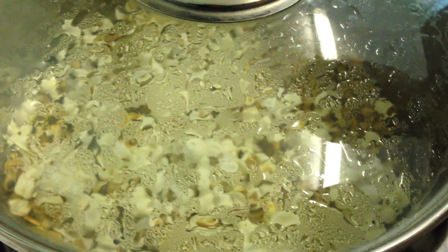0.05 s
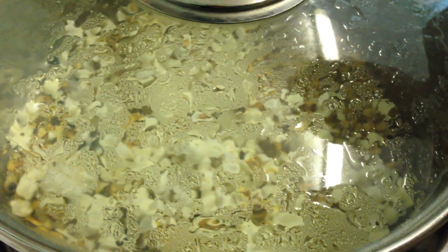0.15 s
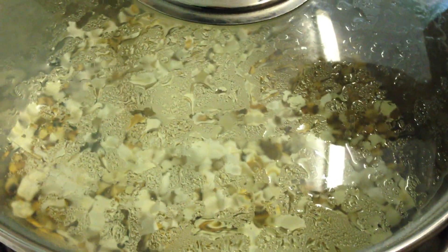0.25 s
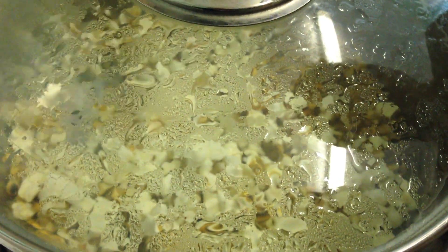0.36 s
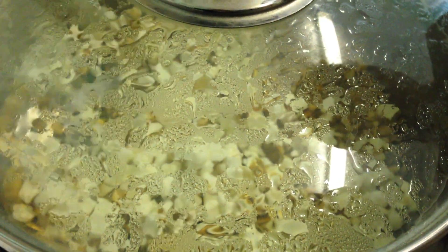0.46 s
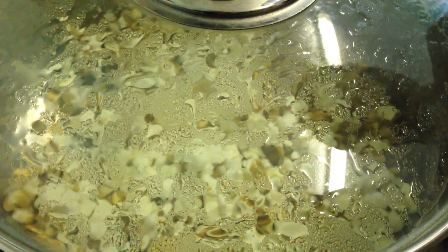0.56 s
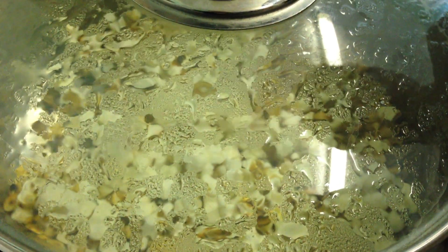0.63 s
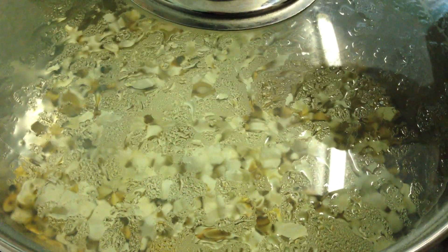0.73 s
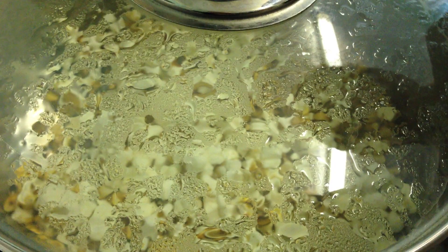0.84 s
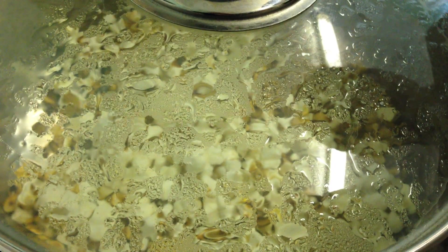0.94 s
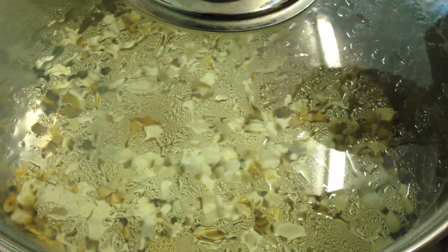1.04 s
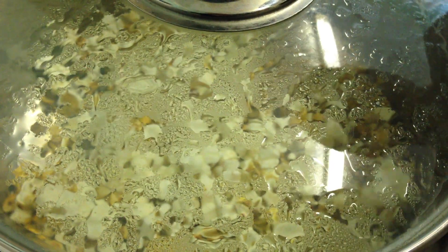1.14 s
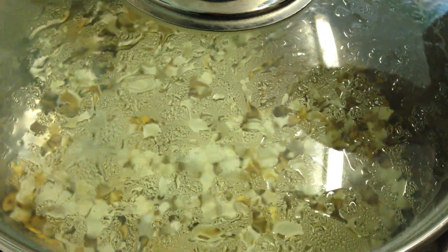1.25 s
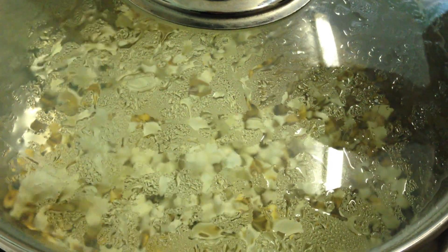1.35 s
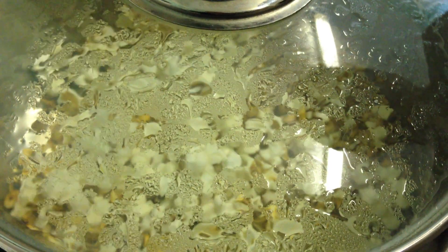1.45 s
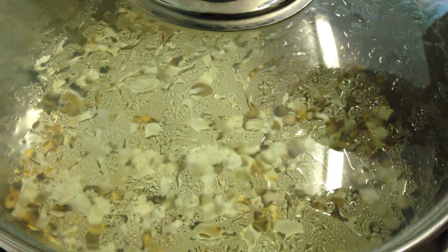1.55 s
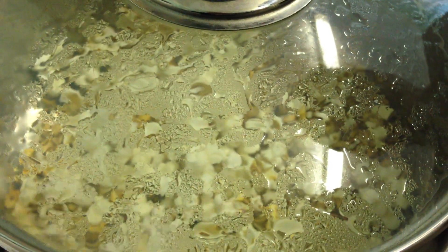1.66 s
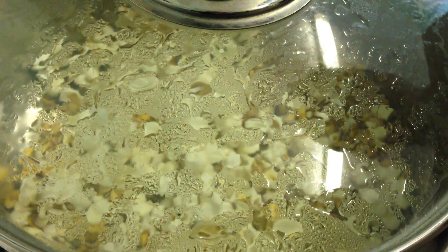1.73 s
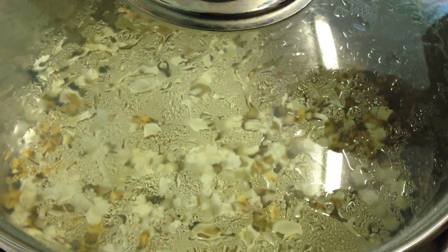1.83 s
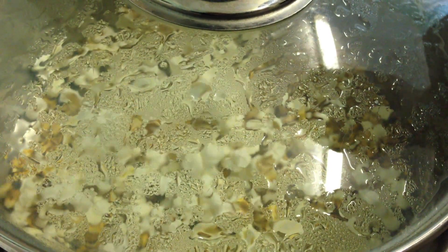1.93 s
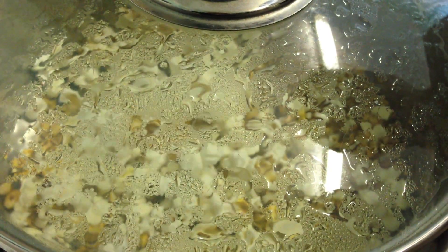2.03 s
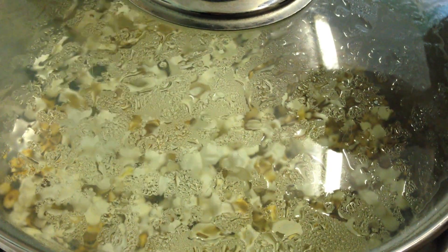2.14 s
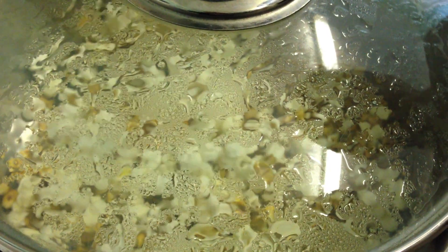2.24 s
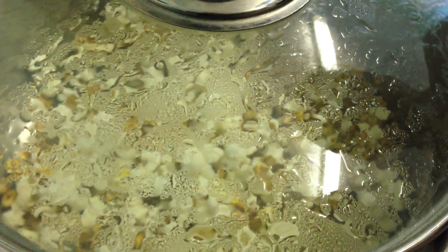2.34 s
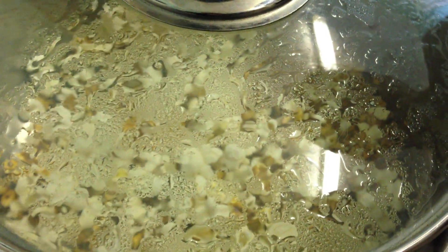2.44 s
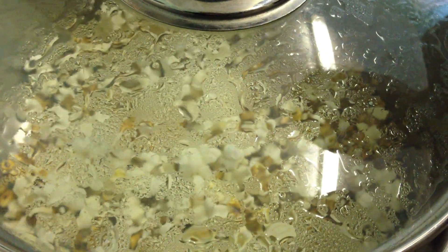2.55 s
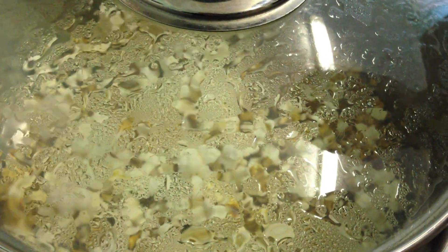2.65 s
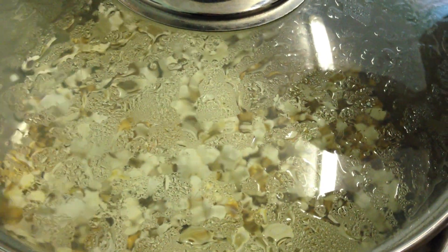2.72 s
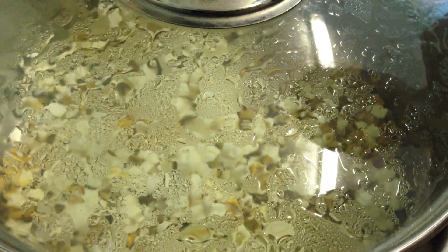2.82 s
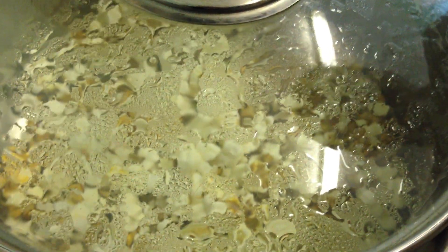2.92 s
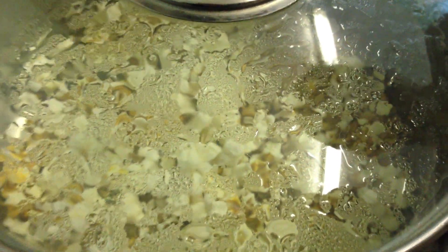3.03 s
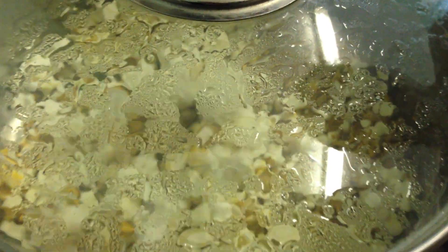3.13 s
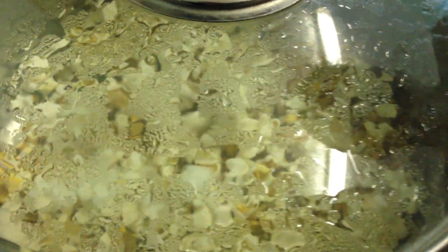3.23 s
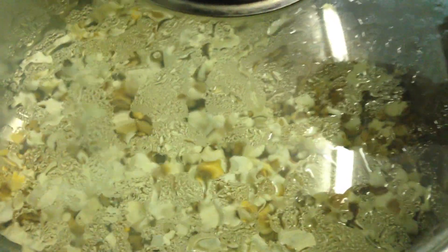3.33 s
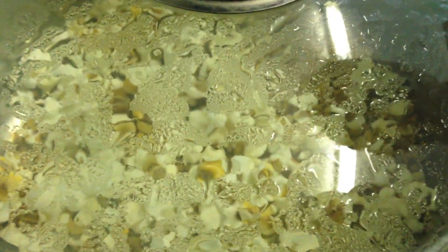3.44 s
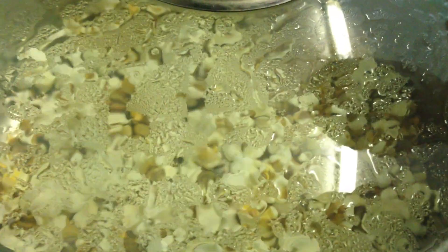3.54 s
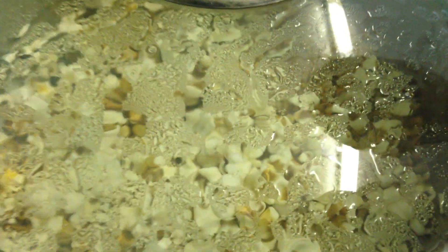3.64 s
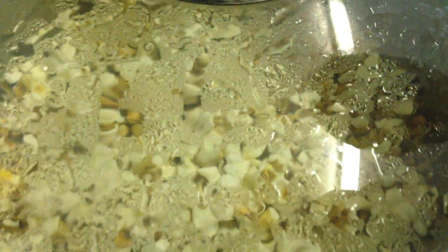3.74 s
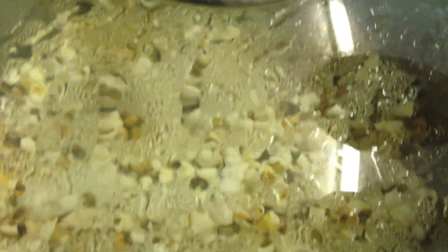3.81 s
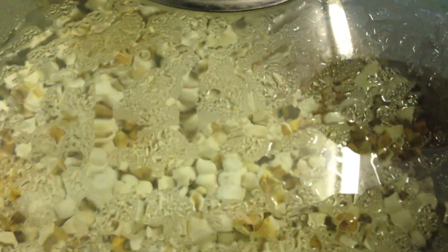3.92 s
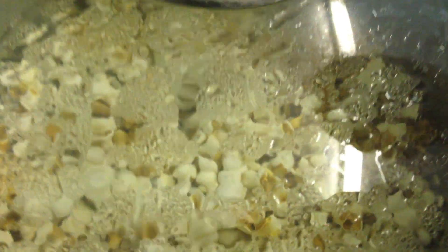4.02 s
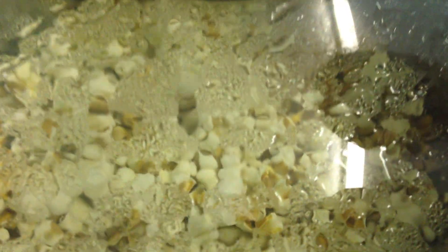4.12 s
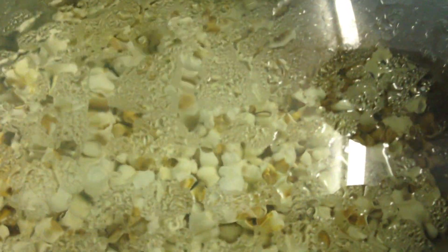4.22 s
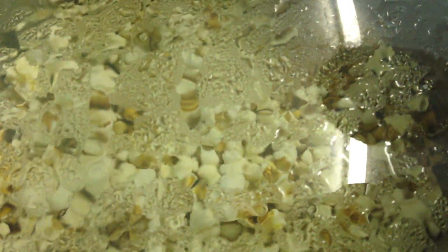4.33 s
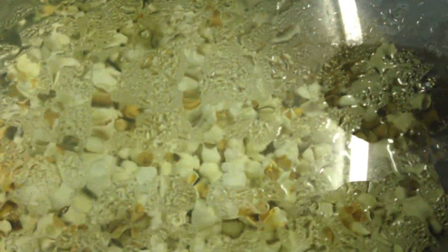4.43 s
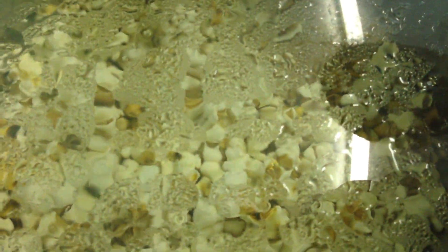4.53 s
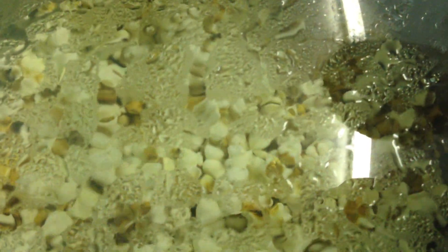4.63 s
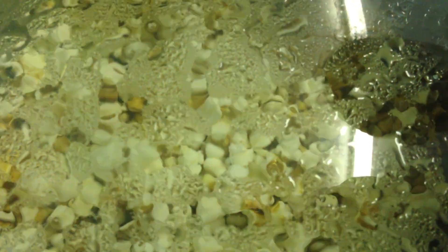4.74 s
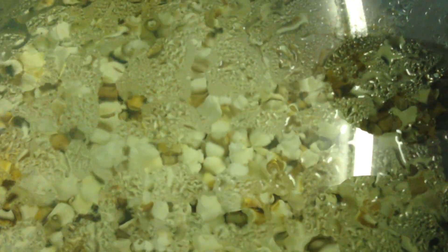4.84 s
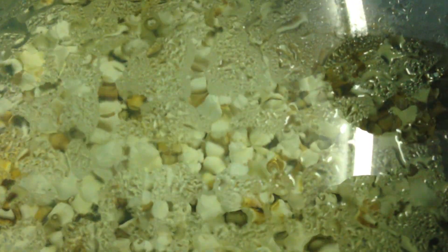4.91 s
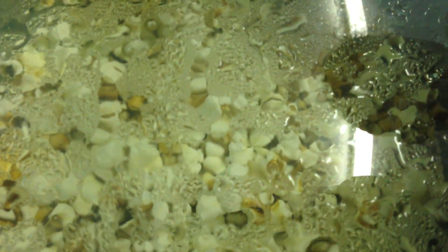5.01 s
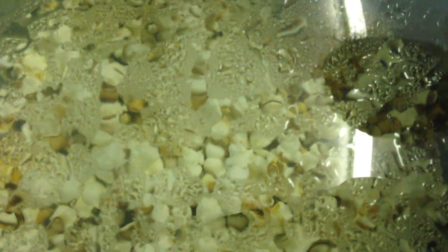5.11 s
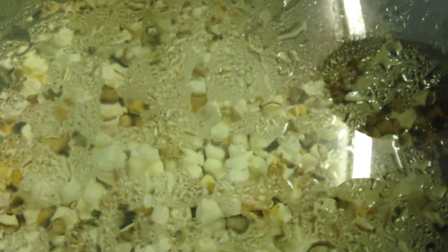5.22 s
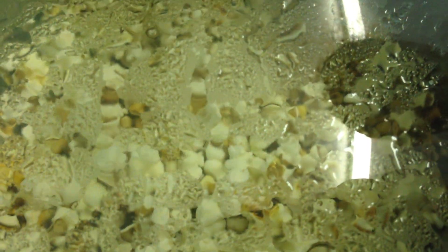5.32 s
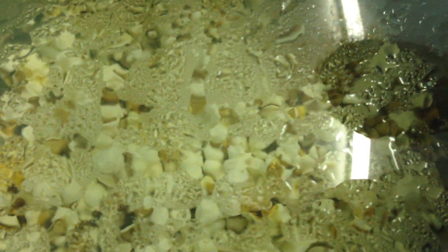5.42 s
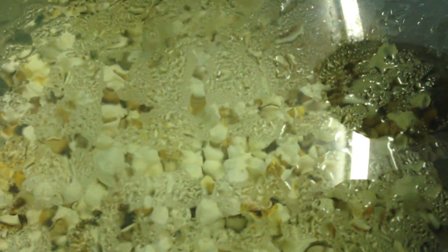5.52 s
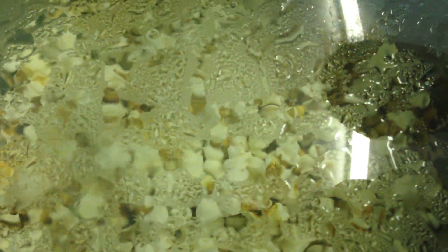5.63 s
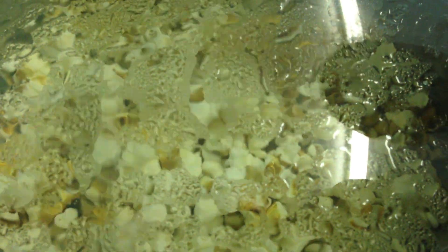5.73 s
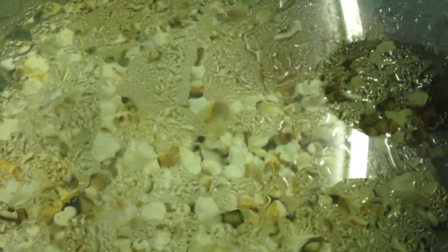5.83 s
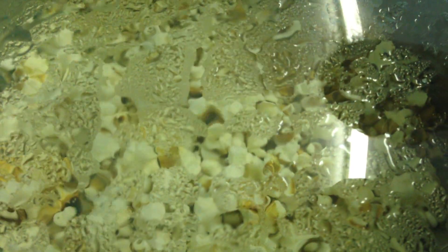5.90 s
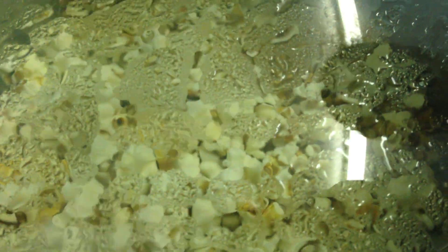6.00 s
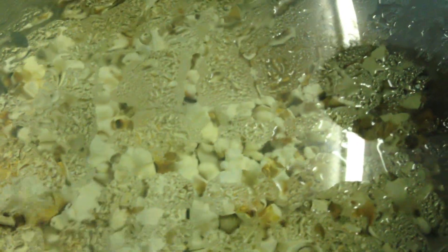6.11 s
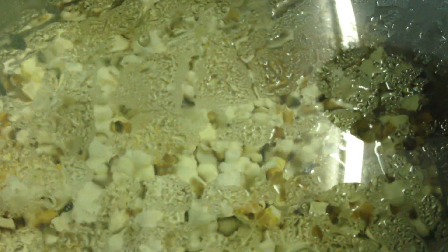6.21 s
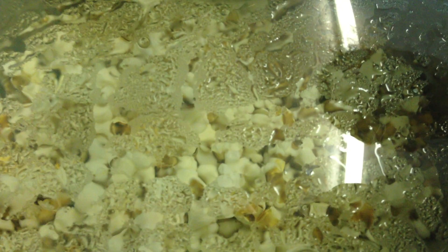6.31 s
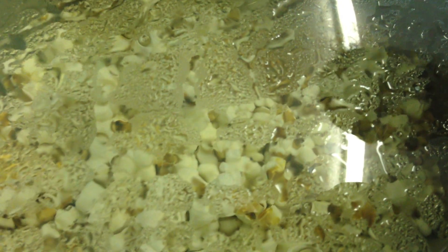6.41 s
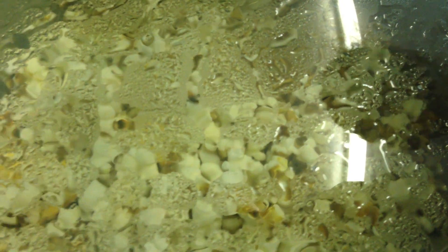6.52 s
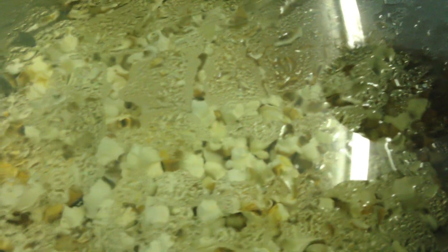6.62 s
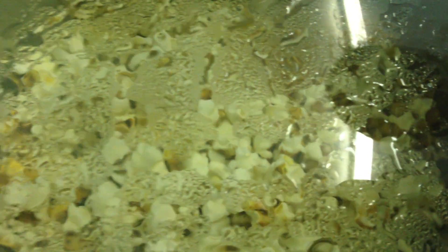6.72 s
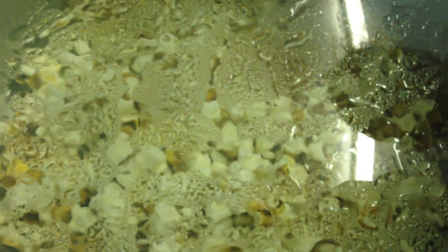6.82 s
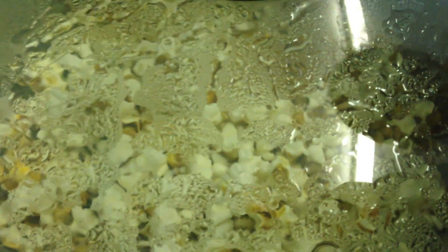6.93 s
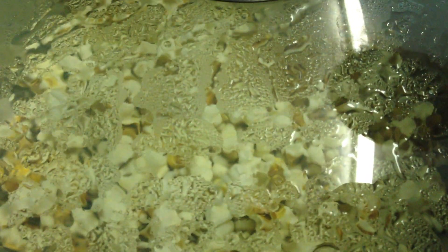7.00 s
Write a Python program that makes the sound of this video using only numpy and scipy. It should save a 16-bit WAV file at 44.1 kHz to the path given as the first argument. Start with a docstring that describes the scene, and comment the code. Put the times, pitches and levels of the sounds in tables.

```python
"""Popcorn bursts in a lidded metal pot on a stove, heard from just above the lid in a small kitchen. Each
kernel is a sharp crack or short rush of noise that rings the pot's modes and thumps the lid's. The pot rattles
on its grate and corn rustles after each nudge; the lid drops back on its rim with a clack. Beneath lie a
swelling hiss of steam and, near 1.28 s, of sliding corn, made of fizzing noise and resonances, with ticking
oil, a low rumble of corn and the burner's even rush."""
import sys
import numpy as np
from scipy import signal
from scipy.fft import rfft, irfft
from scipy.io import wavfile
from scipy.ndimage import uniform_filter1d

SR = 44100
rng = np.random.default_rng(int(sys.argv[2]) if len(sys.argv) > 2 else 0)


def wav_out(sig):
    """Save sig, one row per channel (or a flat mono array), as 16-bit PCM at SR to the path in sys.argv[1]."""
    wavfile.write(sys.argv[1], SR, np.round(np.clip(np.atleast_2d(sig).T, -1, 1) * 32767).astype(np.int16))


N = 311342
LENGTH = 8192  # samples in one burst or ring
AGE = np.arange(LENGTH) / SR  # s since the blow

# modes of the pot and the air in it: freq_hz, level_db, t60_s
POT_MODES = [(1314.5, 2, 0.058), (2128.5, 2, 0.07), (2627, -7.5, 0.086), (2867, -12, 0.034),
             (3076, -6, 0.046), (3347, -8, 0.049), (3592, -6, 0.05), (3711, -7.5, 0.071),
             (4166, -1.5, 0.018), (4400, -5.5, 0.048), (4920, -1.5, 0.032), (5740, -15, 0.046),
             (5726, -10, 0.079), (6380, -5.5, 0.043), (7490, -5, 0.021)]
# modes of the lid heaving on the trapped air: freq_hz, level_db, t60_s
LID_MODES = [(172.6, -17.5, 0.19), (217.4, -1.5, 0.14), (225.5, -25, 0.17), (280.6, -15, 0.2),
             (367, -26.5, 0.029)]
# nudges that rock the pot on the grate: start_s, level_db, clatter_t60_s
NUDGES = [(.428, -43, 0.27), (.495, -41, 0.083), (.554, -41, 0.048), (.605, -50.5, 0.37),
          (1.075, -49, 0.18), (1.13, -53, .12), (1.49, -59, 0.34), (1.93, -50, 0.28), (2.692, -53, 0.091),
          (2.828, -57.5, .1), (3.176, -50, 0.52), (4.119, -54.5, 0.24), (5.755, -51, 0.31),
          (5.82, -56, .15), (6.027, -54, .06), (6.2, -54.5, 0.13)]

BURST_T60_S = 0.024  # of a strong kernel
SNAP_SHARE = 0.12  # of burst energy in the first swing, at treble_db = 0
REF_HISS_DB = -56.5  # hiss level at which rumble, oil and small pops have their nominal levels


def undb(db):
    """Decibels to amplitude gain."""
    return 10 ** (np.asarray(db) / 20)


def unit(x):
    """Scale to an rms of one."""
    return x / np.sqrt(np.mean(x ** 2))


def fade(t_s, t60_s):
    """Exponential decay, 60 dB down after t60_s."""
    return np.exp(-np.log(1000) * t_s / np.maximum(t60_s, 1e-3))


def db_at(freq_hz, points):
    """Interpolate (freq_hz, gain_db) points on a log-frequency axis."""
    point_hz, gain_db = np.transpose(points)
    return np.interp(np.log(np.maximum(freq_hz, 1)), np.log(point_hz), gain_db)


def colour(x, *spectra, size=2048):
    """Minimum-phase filter, by folded cepstrum, whose gain is the dB sum of the spectra."""
    freq_hz = np.fft.rfftfreq(size, 1 / SR)
    gain_db = sum(db_at(freq_hz, s) for s in spectra)
    cepstrum = irfft(np.log(undb(gain_db)))
    cepstrum[1:size // 2] *= 2
    cepstrum[size // 2 + 1:] = 0
    impulse = irfft(np.exp(rfft(cepstrum)))
    return signal.fftconvolve(x, impulse)[:len(x)]


def ring(modes, scatter_db, detune, blow=((1, 0), (2, 0)), flip=True):
    """Sum of decaying sine modes; each blow lands somewhere else and weights them afresh."""
    freq_hz, level_db, t60_s = np.transpose(modes)
    size, shift, side = rng.standard_normal((len(freq_hz), 3)).T
    sign = np.where(flip, np.sign(side), 1)
    gain = sign * undb(level_db + scatter_db * size + db_at(freq_hz, blow))
    shifted_hz = freq_hz * (1 + detune * shift)
    sines = np.sin(2 * np.pi * np.outer(shifted_hz, AGE))
    return gain @ (sines * fade(AGE, t60_s[:, None]))


def resonate(x, modes):
    """A steady sound driving a set of modes, scaled to unit rms."""
    return unit(signal.fftconvolve(x, ring(modes, 0, 0, flip=False))[:N])


def walk(rate_hz):
    """Slow random drift of unit rms: smoothed random steps."""
    step = int(SR / rate_hz)
    steps = np.repeat(rng.standard_normal(N // step + 1), step)
    return unit(uniform_filter1d(steps, step)[:N])


def grains(per_s, spread_db):
    """Sparse random clicks of either sign, mostly small with a few large."""
    size = undb(spread_db * np.minimum(rng.exponential(size=N), 3))
    clicks = size * rng.choice([-1, 1], N)
    return unit(clicks * (rng.random(N) < per_s / SR))


def add(out, start_s, x):
    """Mix x in at start_s."""
    i = max(int(start_s * SR), 0)
    out[i:i + len(x)] += x[:N - i]


def burst(t60_s, snap, swing_hz=5200, swing_t60_s=.0007):
    """The hull splits with one sharp swing; steam and reflections in the pot follow as a noise rush."""
    snap = np.clip(snap, 0, 1)
    swing = np.cos(2 * np.pi * swing_hz * AGE) * fade(AGE, swing_t60_s)
    rush = rng.standard_normal(LENGTH) * fade(AGE, t60_s)
    x = np.sqrt(snap) * unit(swing) + np.sqrt(1 - snap) * unit(rush)
    return unit(x) * np.sqrt(.008 / AGE[-1])  # energy of 8 ms at unit rms


def burner():
    """The stove's soft, even rush: steady noise weighted to the lows."""
    spectrum = [(30, -9), (150, 2.0), (350, 2.5), (600, -8.5),
                (1100, -10.0), (2000, -16), (6000, -22.0), (15000, -18.5)]
    return unit(colour(rng.standard_normal(N), spectrum))


def rumble(lid_db=-2, heave_db=3.5):
    """Tumbling corn pushes on the pot in uneven swells of low noise and bumps the lid modes."""
    # corn on the pot: freq_hz, gain_db
    rumble_spectrum = [(25, -47), (60, -24), (100, 4), (150, -3.5), (230, 0.5), (300, -2.5), (450, -15),
                       (700, -18.5), (1100, -20), (2000, -41)]
    wall = unit(colour(rng.standard_normal(N), rumble_spectrum))
    bumps = grains(per_s=30, spread_db=3)
    lid = resonate(colour(bumps, rumble_spectrum), LID_MODES)
    return wall * undb(heave_db * walk(22)) + undb(lid_db) * lid


def oil(tick_t60_s=0.032, ring_db=-11):
    """Oil spits and loose kernels tick on the wall in flurries, ringing the pot faintly."""
    spits = unit(grains(per_s=30, spread_db=3) * undb(1.5 * walk(6)))
    ticks = signal.fftconvolve(spits, burst(tick_t60_s, 0.063))[:N]
    ticks = colour(ticks, [(300, -21), (1500, -10.5), (4000, 3), (7000, -4.5), (15000, -9.5)])
    return unit(ticks) + undb(ring_db) * resonate(ticks, POT_MODES)


def hissing(ring_db=-1, flutter_db=2.5, fizz_db=-2):
    """Steam, and near 1.28 s sliding corn, hisses as fizzing noise with resonances that sound in fits."""
    # hiss: freq_hz, gain_db
    hiss_spectrum = [(500, -47), (1300, -15.5), (2400, -3.5), (3600, 0.5), (4900, -2), (6000, 6),
                     (7600, -2), (10300, -3.5), (12000, -4), (15000, -8.5)]
    # resonances of the pot and the gap under the lid: freq_hz, level_db, t60_s
    vent_modes = [(1305, -12, 0.14), (2133, 5.5, 0.045), (2640, -16, 0.048), (3186, 3.5, 0.031),
                  (3650, 4, 0.048), (4530, 3, 0.02), (5730, 7.5, 0.012), (6200, -5, 0.021),
                  (9060, -1, 0.01), (10300, -2, 0.0039)]
    fizz = grains(per_s=900, spread_db=3)
    jet = rng.standard_normal(N) + undb(fizz_db) * fizz
    fits = undb(2.5 * walk(12))
    hiss = unit(colour(jet, hiss_spectrum)) + undb(ring_db) * resonate(jet * fits, vent_modes)
    return hiss / np.sqrt(2) * undb(flutter_db * walk(28))


def tumble(level_db=-0.5, rise_s=0.019, t60_s=0.34):
    """Corn slides and settles after every nudge: dense dry grains under a fast-rising, fading envelope."""
    # corn rubbing on corn and steel: freq_hz, gain_db
    rub_spectrum = [(300, -10), (800, 2), (2000, -4), (3800, 5), (6000, -2), (9000, -9), (15000, -21)]
    t = np.arange(N) / SR
    motion = np.zeros(N)
    for start_s, nudge_db, _ in NUDGES:
        age_s = np.maximum(t - start_s, 0)
        rise = 1 - np.exp(-age_s / rise_s)
        motion += undb(nudge_db + level_db) * rise * fade(age_s, t60_s)
    rubs = grains(per_s=500, spread_db=4)
    rustle = signal.fftconvolve(rubs, burst(0.011, .1))[:N]
    return motion * unit(colour(rustle, rub_spectrum))


def rattle(level_db=-6.0, grate_db=-5, bars=3):
    """The rocking pot chatters on the grate: on each bar a run of dry, uneven, dying contacts."""
    # modes of the grate and the pot's base: freq_hz, level_db, t60_s
    grate_modes = [(705, -8, 0.11), (795, 6, 0.078), (890, -7, 0.035), (1010, 3.5, 0.035),
                   (1087, 12.5, 0.032), (1510, 5.5, .03), (1800, -1, .04), (1910, -4, 0.086),
                   (2430, 4, 0.026), (3560, 4, 0.038), (4050, 14, 0.032), (4500, 1, .03)]
    tick_spectrum = [(300, -13), (800, 10), (2000, 6), (4000, 11), (7000, -6), (11000, -11)]
    out = np.zeros(N)
    for start_s, nudge_db, t60_s in NUDGES:
        for _ in range(bars):
            touches = rng.random(LENGTH) < 150 / SR  # 150 per s on average
            contacts = touches * rng.uniform(-1, 1, LENGTH) * fade(AGE, t60_s)
            tick = colour(burst(.02, .1), tick_spectrum)
            knock = ring(grate_modes, scatter_db=2.5, detune=.035)
            knock = undb(grate_db) * colour(knock, [(400, 9), (700, 3.0)]) + tick
            add(out, start_s, undb(nudge_db + level_db) * signal.fftconvolve(contacts, knock))
    return out


def clack(start_s=6.1185, level_db=-25):
    """The lid drops back on its rim: a short, hollow cluster of modes."""
    out = np.zeros(N)
    # freq_hz, level_db, t60_s
    rim_modes = [(1750, 5, 0.011), (2040, -1, .014), (2970, -6, .012), (4000, -5, .012)]
    add(out, start_s, undb(level_db) * ring(rim_modes, scatter_db=1, detune=0))
    return out


def pop(level_db, treble_db, thump_db, t60_s, snap, crack_db=-1, pot_db=-1.5, lid_db=0, body_db=-13):
    """A kernel cracks, rings the pot and pushes on the lid; the harder the push, the more pot ring."""
    # bursting hull: freq_hz, gain_db
    crack_spectrum = [(40, 22), (130, -8), (350, -1), (650, -17), (1100, 7.5), (1800, 4), (2800, 5.5),
                      (4500, 4), (7000, 10), (10000, 8.5), (15000, 0.5)]
    # duller kernels ring the pot more
    ring_db = -7 + 0.53 * (thump_db - level_db) - 0.08 * treble_db
    tilt_db = treble_db + 7.5  # re the usual treble
    blow = [(850, body_db), (1300, ring_db), (1900, ring_db + 0.5),
            (3200, -0.097 * tilt_db), (5600, 0.16 * tilt_db), (9500, treble_db)]
    crack = colour(burst(t60_s, snap), crack_spectrum, blow)
    # tumbling corn and gusts of hot steam shift the modes a little from pop to pop
    pot = ring(POT_MODES, scatter_db=2.5, detune=.005, blow=blow)
    lid = ring(LID_MODES, scatter_db=.5, detune=.024, flip=False)
    # the pot's ring carries little below its lowest mode
    pot = colour(pot, [(700, -14.5), (1200, 0)])
    hull_and_pot = undb(crack_db) * crack + undb(pot_db) * pot
    return undb(level_db) * hull_and_pot + undb(thump_db + lid_db) * lid


def small_pops(hiss_db, treble_db=-9, thump_db=-2, per_hiss=1.0):
    """Faint pops deep in the heap, one at random in each time slot, stronger while the hiss is loud."""
    slot_s = 1 / 6
    median_db, spread_db = -56.5, 7
    out = np.zeros(N)
    for slot_start_s in np.arange(0, N / SR - slot_s, slot_s):
        start_s = slot_start_s + rng.random() * slot_s
        hiss_gain_db = per_hiss * (hiss_db[int(start_s * SR)] - REF_HISS_DB)
        level_db = median_db + hiss_gain_db + spread_db * rng.standard_normal()
        add(out, start_s, pop(level_db, treble_db, level_db + thump_db, BURST_T60_S, SNAP_SHARE))
    return out


def kernels():
    """Sharp pops (bright on the heap, dull when buried), slow steam spurts and soft thuds on the lid."""
    # bursting kernels: start_s, level_db, treble_db (re level), thump_db
    pops = [(.001, -29.5, -8.5, -27.5), (0.06, -42, -24, -37), (.300, -56.5, 2.5, -61),
            (.350, -26.5, -15, -27.5), (0.4148, -30.5, -2, -32), (.429, -33, -16, -34),
            (.503, -32.5, -20, -30), (0.521, -33.5, -9, -35.5), (.626, -20, -9, -33.5),
            (.701, -22, -6.5, -28), (.816, -32.5, -12.5, -36), (1.2258, -36, -20, -36.5),
            (1.286, -29, -4.5, -36.5), (1.339, -24, -2, -34.5), (1.348, -26.5, -6.5, -36.5),
            (1.3868, -37, -8, -36.5), (1.578, -31, -5.5, -41), (1.598, -41.5, -1, -48),
            (1.686, -36, -1.5, -31), (1.809, -37, -8.5, -31.5), (1.839, -34.5, -11.5, -43),
            (1.946, -32.5, -11.5, -31), (2.215, -47, -7, -49.5), (2.291, -24, -3, -44),
            (2.438, -35, -4, -40), (2.51, -42, -29, -63), (2.579, -26.5, -4.5, -36), (2.679, -49.5, 3, -43),
            (2.7055, -23.5, -2.5, -36.5), (2.971, -41, -19, -42), (3.050, -37.5, -10.5, -55),
            (3.0815, -33.5, -24, -28.5), (3.190, -35, -3.5, -33.5), (3.256, -36, 1.5, -46),
            (3.350, -46, 4.5, -38.5), (3.457, -34.5, -5, -38.5), (3.473, -44.5, 2, -55),
            (3.497, -47, -1, -54), (3.527, -35, -19, -43), (3.587, -37.5, -1, -45), (3.5998, -27, -17, -35),
            (3.630, -28, -8, -32.5), (3.6936, -21.5, -12, -29.5), (3.821, -35, -7.5, -42.5),
            (3.920, -41, -21, -44), (4.024, -39.5, -11.5, -53), (4.102, -29.5, -4, -32),
            (4.4152, -40, -2, -47), (4.579, -43, -2, -56), (4.66, -38, -0.5, -47), (4.7445, -47.5, 4, -52),
            (4.763, -43.5, -3, -47), (4.788, -31, -2, -29), (4.919, -23, -9, -31.5),
            (5.262, -42.5, -25, -32), (5.5611, -28.5, -13.5, -40), (5.577, -25.5, -16, -33),
            (5.659, -47.5, -3.5, -50), (5.702, -41.5, -2, -39), (5.731, -32.5, -6, -33),
            (5.739, -28.5, -13.5, -25), (5.963, -47, -4, -50), (6.070, -34.5, -3, -31),
            (6.126, -34.5, -16, -34), (6.1334, -22, -3.5, -32.5), (6.432, -38, 1.5, -43),
            (6.558, -36.5, -3, -45.5), (6.750, -40, -5, -49.5)]
    # kernels splitting slowly, hardly touching the pot: start_s, level_db, t60_s
    spurts = [(.460, -29.5, 0.11), (.5794, -23.5, 0.051), (.611, -22.5, 0.051), (.795, -46, 0.076),
              (1.198, -36, 0.065), (1.314, -38.5, 0.14), (1.430, -37, 0.1), (1.923, -39.5, .08),
              (2.69, -43.5, 0.078), (3.156, -38.5, 0.065), (3.167, -38, 0.047), (3.320, -39, 0.16),
              (5.881, -37.5, 0.044)]
    # fluffy corn thrown against the lid: start_s, thump_db
    thuds = [(.409, -25.5), (1.08, -37), (1.366, -35.5), (1.508, -40), (3.112, -43), (3.40, -38),
             (3.877, -36.5), (4.067, -38), (4.826, -35), (5.717, -27), (6.1179, -33.5), (6.534, -37)]
    strong_db, slowing = -28, 0.14  # weaker kernels burst longer: dB of length per dB below strong_db
    snap_per_treble = 0.69  # dB per dB
    out = np.zeros(N)
    for start_s, level_db, treble_db, thump_db in pops:
        t60_s = BURST_T60_S * undb(slowing * (strong_db - level_db))
        snap = SNAP_SHARE * undb(snap_per_treble * treble_db)
        add(out, start_s, pop(level_db, treble_db, thump_db, t60_s, snap))
    for start_s, level_db, t60_s in spurts:
        add(out, start_s, pop(level_db, -13, level_db - 23, t60_s, snap=0))
    for start_s, thump_db in thuds:
        rustle_db = thump_db - 16
        add(out, start_s, pop(rustle_db, -4.5, thump_db, t60_s=0.069, snap=0))
    return out


def kitchen(x, level_db=-17, t60_s=0.16, rise_s=0.0087):
    """Diffuse echoes from hob, wall and cupboards: convolution with a decaying noise tail."""
    t = np.arange(SR // 2) / SR
    tail = rng.standard_normal(len(t)) * fade(t, t60_s) * (1 - np.exp(-t / rise_s))
    tail = colour(tail, [(200, -9.0), (1000, 5), (2200, 2.5), (4000, -0.5), (8000, 0.0), (15000, -4)])
    return x + undb(level_db) * signal.fftconvolve(x, tail / np.linalg.norm(tail))[:N]


def scene(hiss_trim_db=2.0, rumble_db=-60, oil_db=-60.5, burner_db=-66):
    """Pops over hiss, oil and the rocking pot, all in the kitchen."""
    # level of the hiss, from steam and, near 1.28 s, sliding corn: time_s, hiss_db (before trim)
    hiss_levels = [(0.85, -65), (1.09, -68.5), (1.28, -46.5), (1.56, -65.5), (1.85, -60), (2.01, -69.5),
                   (2.23, -65.5), (2.51, -58), (2.96, -66.5), (3.41, -55), (4.29, -49), (4.48, -56),
                   (4.88, -53), (5.09, -60), (5.74, -54), (6.06, -56.5), (6.23, -62), (7.06, -67)]
    hiss_db = np.interp(np.arange(N) / SR, *np.transpose(hiss_levels))
    # rumble and oil rise with the hiss, dB per dB
    stir_db = rumble_db + 0.57 * (hiss_db - REF_HISS_DB)
    spit_db = oil_db + 0.44 * (hiss_db - REF_HISS_DB)
    bed = undb(burner_db) * burner() + undb(stir_db) * rumble()
    bed += undb(spit_db) * oil() + undb(hiss_db + hiss_trim_db) * hissing()
    pot_moves = tumble() + rattle()
    corn = clack() + small_pops(hiss_db) + kernels()
    return kitchen(bed + pot_moves + corn)[None]


def record(dry):
    """A small microphone loses deep bass and rounds the sharpest cracks; a steep low-pass cuts the top."""
    thin = colour(dry[0], [(25, -28), (60, -19.5), (100, -16), (150, -2.5), (200, 0)])
    rounded = .8 * np.tanh(thin / .8)
    top_hz = 15400
    low_pass = signal.ellip(8, .2, 70, top_hz, fs=SR, output="sos")
    return signal.sosfilt(low_pass, rounded)[None]


dry = scene()
out = record(dry)
wav_out(out)
```